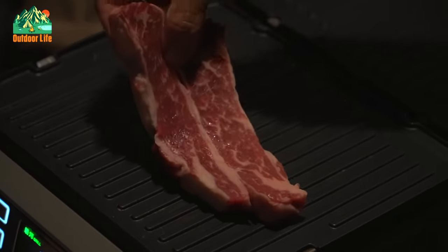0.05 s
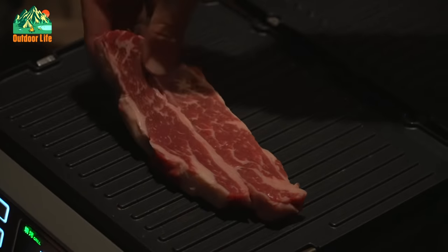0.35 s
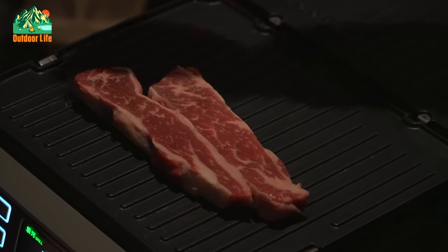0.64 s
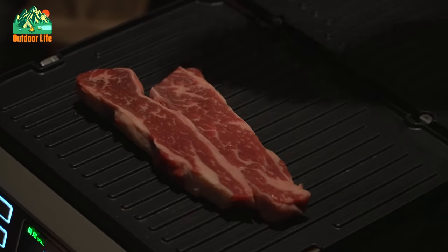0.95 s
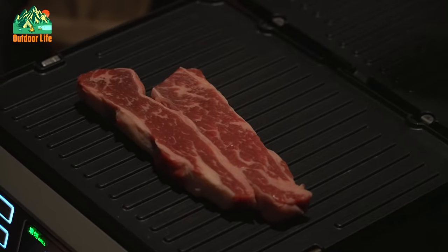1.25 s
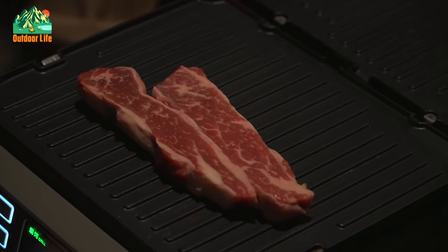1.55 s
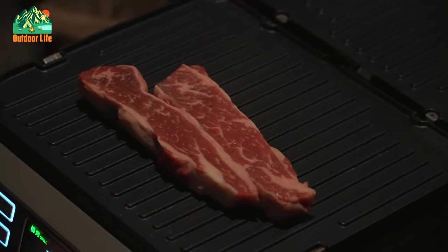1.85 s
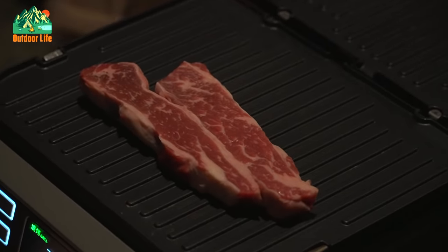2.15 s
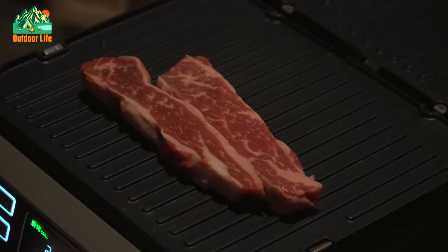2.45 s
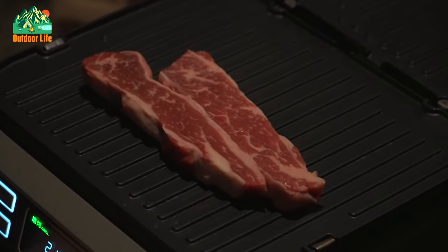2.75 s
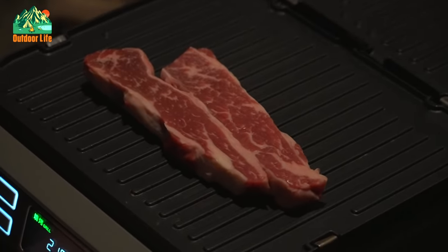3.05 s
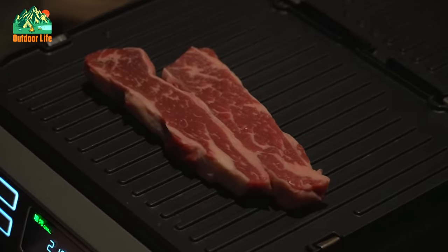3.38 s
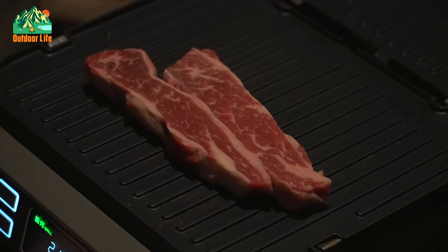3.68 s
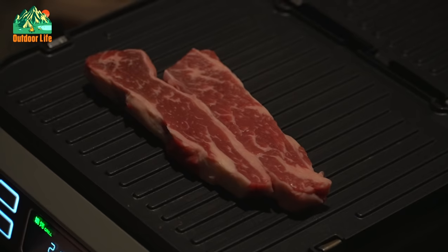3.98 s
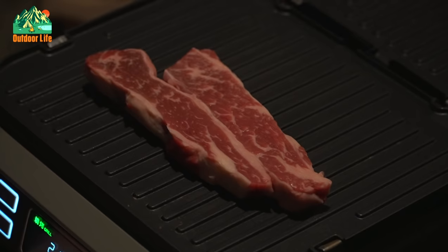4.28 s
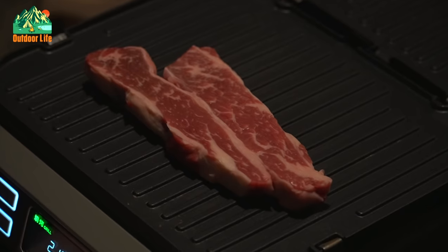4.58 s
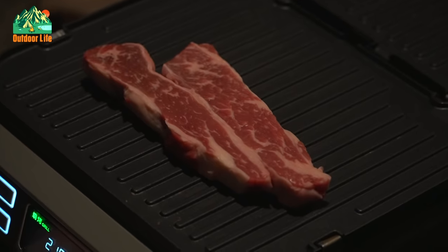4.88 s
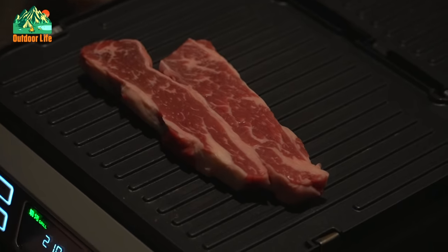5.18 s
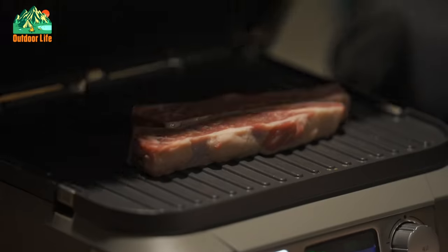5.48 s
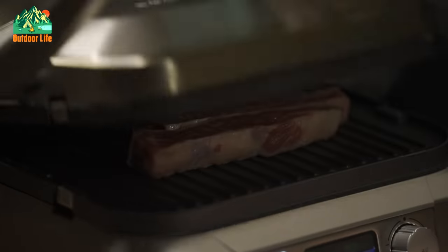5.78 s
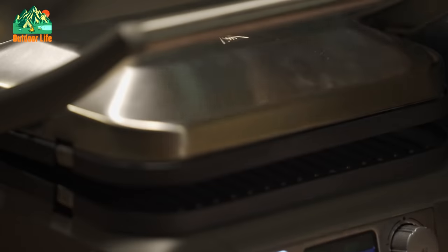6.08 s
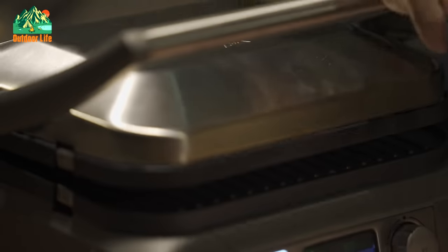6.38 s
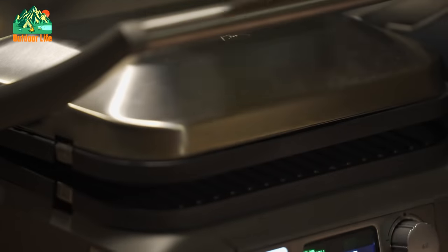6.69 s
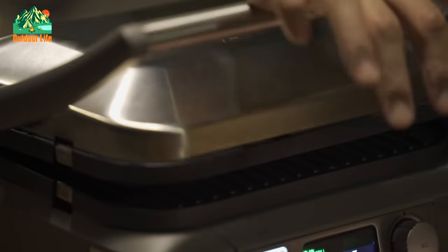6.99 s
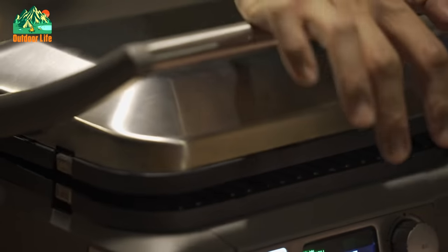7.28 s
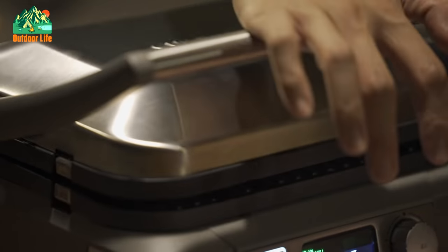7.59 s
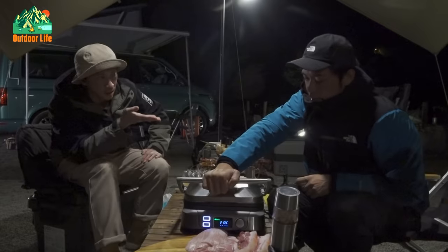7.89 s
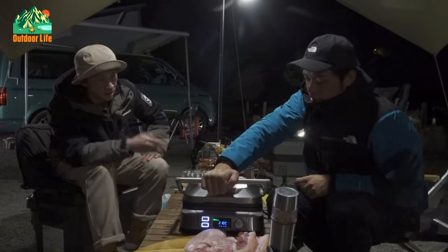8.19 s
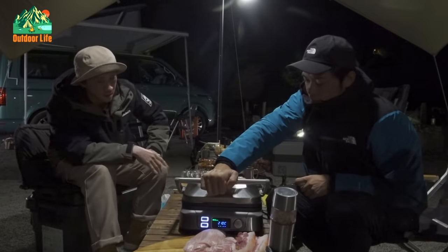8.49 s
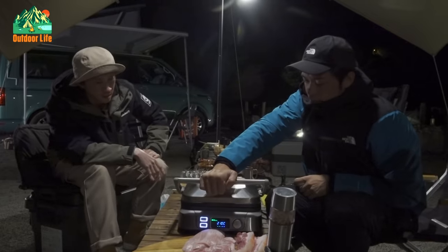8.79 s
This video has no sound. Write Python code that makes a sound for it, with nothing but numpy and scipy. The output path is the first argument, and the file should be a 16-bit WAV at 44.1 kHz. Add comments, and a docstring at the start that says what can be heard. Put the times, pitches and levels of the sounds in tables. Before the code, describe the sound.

Heard from close by outdoors, meat hisses and crackles on a hot contact grill. The sizzle builds over the first second, joined by a short rattling clunk, then carries on evenly with dull plops, gurgling juice and sharp snaps of fat. Soft handling bumps and a faint low rumble lie beneath. Late on, the lid is pressed down and the sizzle gets a little louder.

```python
"""A sizzle swells, with a clunk and a few dull knocks, as a raw steak settles on the hot ribbed plate of
an electric contact grill: outdoors, one microphone close by. Countless tiny steam bubbles burst, juice
gurgles under the meat and fat spits now and then. Near the end a hand takes the lid's handle and presses
it down, and the sizzle steps up. Beneath it all lie soft handling bumps and a low outdoor rumble."""
import sys
import numpy as np
from scipy import signal
from scipy.fft import rfft, irfft
from scipy.io import wavfile
from scipy.ndimage import uniform_filter1d

SR = 44100
rng = np.random.default_rng(int(sys.argv[2]) if len(sys.argv) > 2 else 0)


def generate_wav(signal):
    """Clip the signal to [-1, 1] and save it as 16-bit WAV at the path in sys.argv[1]."""
    frames = np.transpose(np.atleast_2d(signal))
    scaled = np.clip(frames, -1, 1) * 32767
    pcm = np.round(scaled).astype(np.int16)
    wavfile.write(sys.argv[1], SR, pcm)


N = 394254
TIME = np.arange(N) / SR

# Colour of a deep rumble. Each row: frequency in Hz, spectral level in dB.
RUMBLE_COLOUR = [(15, -36), (30, -17), (42, 0), (64, -1), (85, -13), (130, -22), (185, -15), (300, -36),
                 (1000, -80)]
# Colour of bursting bubbles. Each row: frequency in Hz, spectral level in dB.
BURST_COLOUR = [(100, -28.5), (260, -31.5), (340, -19.5), (450, -22.5), (700, -15), (1200, -10.5),
                (2000, -5.5), (3500, 0), (6200, 1), (7000, -1.5), (9000, -0.5), (11400, -1.5),
                (13000, -0.5), (15700, -11.5)]
# Broad resonances that colour the sizzle. Each row: centre in Hz, width in Hz, lift in dB.
PLATE_RESONANCES = [(2735, 455, 4), (4600, 820, 1), (5420, 600, 2), (5910, 790, 2.5), (7900, 1200, 2),
                    (9380, 640, 2), (10310, 1040, 4.5)]


def amp(db):
    """Decibels to gain."""
    return 10 ** (np.asarray(db) / 20)


def unit_rms(x):
    """Scales to rms 1."""
    return x / np.sqrt(np.mean(x ** 2) + 1e-20)


def spectrum(points, hz):
    """Reads (Hz, value) points on a log-frequency axis."""
    f, value = np.transpose(points)
    return np.interp(np.log(hz + 1), np.log(f + 1), value)


def curve(rows, t):
    """Reads every column of a time table at the times t."""
    row_s, *columns = np.transpose(rows)
    return [np.interp(t, row_s, column) for column in columns]


def add(mix, start_s, sound):
    """Mixes a sound in at start_s."""
    part = mix[max(round(start_s * SR), 0):][:len(sound)]
    part += sound[:len(part)]


def response(points, peaks=(), size=8192):
    """Minimum-phase impulse response with a given spectrum and resonant lifts."""
    hz = np.fft.rfftfreq(size, 1 / SR)
    lifts_db = sum(lift * .5 ** ((2 * (hz - centre) / width) ** 2) for centre, width, lift in peaks)
    cepstrum = irfft(np.log(amp(spectrum(points, hz) + lifts_db)))
    cepstrum[1:size // 2] *= 2
    cepstrum[size // 2 + 1:] = 0
    return irfft(np.exp(rfft(cepstrum)))[:size // 2]


def coloured(x, points, peaks=()):
    """Passes x through a spectrum; rms 1."""
    return unit_rms(signal.oaconvolve(x, response(points, peaks))[:N])


def bursts(per_s, spread_db, max_spreads):
    """A random train of clicks, mostly small with a few large."""
    size = amp(spread_db * np.minimum(rng.exponential(1, N), max_spreads))
    return unit_rms(size * rng.choice([-1, 1], N) * (rng.random(N) < per_s / SR))


def lid_pressure(t, start_s=7.65, end_s=8.9, ramp_s=.07):
    """1 while the lid is pressed down, else 0, with a short ramp at each end."""
    return np.clip((t - start_s) / ramp_s, 0, 1) * np.clip((end_s - t) / ramp_s, 0, 1)


def outdoors(rumble_db=-47, fade_db_per_s=3.5, floor_db=-66, air_db=-56):
    """A deep rumble dies down to a steady floor, over faint open air."""
    # Low background of the open air. Each row: frequency in Hz, spectral level in dB.
    air_colour = [(40, -10), (88, -12), (125, 1.5), (165, -5.5), (210, 0), (255, -18.5), (335, 2.5),
                  (430, -9.5), (1000, -12), (4000, -61)]
    level = np.hypot(amp(rumble_db - fade_db_per_s * TIME), amp(floor_db))
    rumble = level * coloured(rng.standard_normal(N), RUMBLE_COLOUR)
    return rumble + amp(air_db) * coloured(rng.standard_normal(N), air_colour)


def bumps(pushes):
    """Soft pushes with almost no ring, one for each (time in seconds, peak in dB)."""
    # Colour of one thud. Each row: frequency in Hz, spectral level in dB.
    thud_colour = [(20, -17), (70, -31), (130, 1), (185, -2), (250, -14.5), (500, -15), (1500, -53)]
    out, thud = np.zeros(N), response(thud_colour)
    lead_s = np.argmax(abs(thud)) / SR
    for peak_s, db in pushes:
        add(out, peak_s - lead_s, amp(db) * thud / abs(thud).max())
    return out


def handling():
    """Handling gives scattered soft, low bumps."""
    # Single bumps. Each row: time in seconds, peak in dB.
    pushes = [(1.276, -32), (1.36, -35), (2.96, -36), (2.984, -37), (3.086, -43), (3.151, -38),
              (3.271, -34), (3.347, -38), (3.523, -37), (3.898, -35), (3.926, -35), (3.97, -32),
              (7.461, -41), (8.832, -39)]
    return bumps(pushes)


def grip(start_s=6.71, firm_s=7.31, slips_per_s=20, first_db=-42, last_db=-36.5, weight_db=-57):
    """Fingers slip unevenly on the handle, ever more firmly; the hand's weight rocks the grill."""
    count = round((firm_s - start_s) * slips_per_s) + 1
    times = np.linspace(start_s, firm_s, count) + rng.uniform(-.5, .55, count) / slips_per_s
    slips = bumps(zip(times, np.linspace(first_db, last_db, count)))
    leaning = np.exp(-((TIME - firm_s) / .17) ** 2)
    return slips + amp(weight_db) * leaning * coloured(rng.standard_normal(N), RUMBLE_COLOUR)


def knocks(rise_s=.00079):
    """Dull knocks and plops: short, heavily damped rings."""
    # The knocks. Each row: start in seconds, peak in dB, pitch in Hz, seconds to fall by 60 dB.
    hits = [(.688, -32, 412, .077), (.724, -23, 620, .035), (.729, -21, 670, .05), (.737, -21, 677, .11),
            (.811, -25, 1050, .05), (1.273, -23, 330, .027), (1.512, -34, 420, 0.027),
            (1.668, -28, 856, .03), (1.695, -34, 380, .05), (2.153, -26.5, 726, 0.066),
            (2.201, -26, 790, 0.025), (2.395, -30, 650, .027), (4.276, -37, 345, 0.067),
            (4.428, -30, 684, 0.033), (4.908, -26.5, 864, 0.05)]
    # What a knock rings with. Each row: multiple of its pitch, level in dB.
    modes = [(.68, -11), (1, -3.5), (1.17, -8), (1.42, -9.5), (2.1, -14.5)]
    out, t = np.zeros(N), TIME[:SR // 5]
    for start_s, db, hz, t60 in hits:
        ring = sum(amp(mode_db) * np.sin(2 * np.pi * (hz * ratio * t + rng.random()))
                   for ratio, mode_db in modes)
        ring *= np.exp(-np.log(1000) * t / t60) * (1 - np.exp(-t / rise_s))
        add(out, start_s, amp(db) * ring / abs(ring).max())
    return out


def juice_and_clunk(trickle_db=-46, drying_db_per_s=2, pressed_db=-51.5):
    """Large, dull bubbles under the steak dry up until the lid squeezes out more; one clunk rattles."""
    # The dull rattling body of a clunk at about 0.75 s, then three surges of juice.
    # Each row: crest time in seconds, level in dB, half width in seconds.
    swells = [(.76, -41.5, 0.079), (1.22, -38.5, 0.14), (2.26, -42, 0.13), (4.95, -47, .1)]
    # Colour of the bubbles and the rattle. Each row: frequency in Hz, spectral level in dB.
    dull_colour = [(100, -17.5), (280, -7), (550, -2.5), (1050, -0.5), (1700, -8.5), (4000, -33)]
    trickle = amp(trickle_db - drying_db_per_s * TIME) + amp(pressed_db) * lid_pressure(TIME)
    swell_power = sum((amp(db) * np.exp(-((TIME - crest_s) / width_s) ** 2 / 2)) ** 2
                      for crest_s, db, width_s in swells)
    dull_pops = coloured(bursts(per_s=900, spread_db=2, max_spreads=6.1), dull_colour)
    return np.sqrt(trickle ** 2 + swell_power) * dull_pops


def spits(spray_s=.001, trim_db=-2, small_per_s=1.5, small_db=-9, lying_flat_s=.7):
    """A droplet of fat snaps and throws a brief spray; small ones come at random once the meat is flat."""
    # The loudest spits. Each row: start in seconds, peak in dB before the trim.
    loud = [(1.614, -7), (1.748, -7), (3.208, -7), (4.528, -8), (4.566, -8), (5.974, -8), (6.787, -9),
            (6.945, -8), (7.936, -3), (8.37, -7)]
    out, t, ring = np.zeros(N), TIME[:400], response(BURST_COLOUR, PLATE_RESONANCES)
    small_starts = rng.uniform(lying_flat_s, N / SR, round(small_per_s * N / SR))
    for start_s, db in loud + [(s, small_db) for s in small_starts]:
        spray = .1 * rng.standard_normal(len(t)) * np.exp(-t / spray_s)
        snap = signal.fftconvolve((t == 0) + spray, ring)
        add(out, start_s, amp(db + trim_db) * snap / abs(snap).max())
    return out


def crackle(coarse_db=-8):
    """A dense crowd of fine bubble bursts and fewer large ones that sound duller."""
    fine = bursts(per_s=7000, spread_db=3.8, max_spreads=4.5)
    large = bursts(per_s=350, spread_db=.5, max_spreads=8.1)
    coarse = coloured(large, [(500, .5), (2800, -2.5), (5000, -9.5), (15000, -28)])
    return fine + amp(coarse_db) * coarse


def sizzle(crackle_db=-2.5, vents_db=.8, drying_s=1.5):
    """Bubbles burst over a smooth jet of steam, growing as the meat settles and is pressed."""
    # Slow drift of the settled sizzle. Each row: time in seconds, hiss level in dB,
    # then fine fizz and coarse bubbling in dB relative to the hiss.
    drift = [(1.0, -24.9, -0.5, -6.2), (1.55, -24.2, -1.4, -7.3), (2.1, -24.5, -1.1, -6.5),
             (3.0, -24.3, -2.8, -4.4), (3.4, -24.2, -1.1, -6.0), (3.6, -25.3, -0.0, -4.6),
             (4.2, -25.2, -1.5, -5.3), (4.4, -24.1, -1.0, -5.8), (5.1, -24.7, -1.9, -4.8),
             (5.45, -25.9, -1.3, -5.0), (6.0, -25.3, -1.8, -6.0), (6.8, -26.1, -2.1, -5.1),
             (7.1, -26.6, -3.5, -3.9), (7.6, -25.9, -2.1, -4.7)]
    # Contact with the plate, for hiss, fizz and bubbling in turn.
    # Each row: offset at first touch in dB, settling time in seconds, lift under the lid in dB.
    contact = [(-13.8, .25, 3.3), (-19.5, .3, 3.5), (-14, .4, 2.9)]
    # Extra colour while the surface is wet. Each row: frequency in Hz, lift in dB.
    wet_colour = [(1800, 1.1), (2700, -0.6), (3600, -0.5), (5700, -2), (7200, 2.5), (8600, 0.5),
                  (10300, -1), (12500, 1)]
    steam = rng.standard_normal(N) + amp(crackle_db) * crackle()
    steam = coloured(steam, BURST_COLOUR, PLATE_RESONANCES)
    hz, t, frames = signal.stft(steam, SR, nperseg=512, noverlap=384)
    level_db, fizz_db, bubbling_db = curve(drift, t)
    hiss_contact, fizz_contact, bubbling_contact = (
        touch_db * np.exp(-t / settle_s) + lid_db * lid_pressure(t)
        for touch_db, settle_s, lid_db in contact)
    # Each band's own level is taken out, so that drift and contact set the balance.
    power = np.mean(abs(frames) ** 2, axis=1) * 4 / 3
    bubbling_own, hiss_own, fizz_own = (10 * np.log10(power[(hz > lo) & (hz < hi)].sum())
                                        for lo, hi in [(900, 3200), (3500, 9000), (9000, 15500)])
    # Large bubbles fill the low end, the finest fill the top.
    low = spectrum([(3000, 1), (3800, 0)], hz)[:, None]
    high = spectrum([(8000, 0), (10000, 1)], hz)[:, None]
    db = level_db + (1 - low - high) * (hiss_contact - hiss_own)
    db += low * (bubbling_db + bubbling_contact - bubbling_own)
    db += high * (fizz_db + fizz_contact - fizz_own)
    db += spectrum(wet_colour, hz)[:, None] * np.exp(-(t / drying_s) ** 2)
    # Small vents of steam open and close, each with its own pitch.
    vents = uniform_filter1d(rng.standard_normal(frames.shape), size=5, axis=1)
    db += vents_db * unit_rms(uniform_filter1d(vents, size=6, axis=0))
    return signal.istft(frames * amp(db), SR, nperseg=512, noverlap=384)[1][:N]


def scene():
    """One microphone close to the grill feeds both channels."""
    mono = sizzle() + spits() + juice_and_clunk() + knocks() + handling() + grip() + outdoors()
    return np.array([mono, mono])


def record(dry):
    """The treble ends steeply at 15780 Hz."""
    lowpass = signal.firwin(1023, 15780, window=("kaiser", 9), fs=SR)
    return signal.oaconvolve(dry, lowpass[None], "same")


dry = scene()
out = record(dry)
generate_wav(out)
```